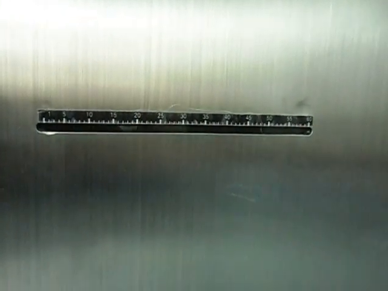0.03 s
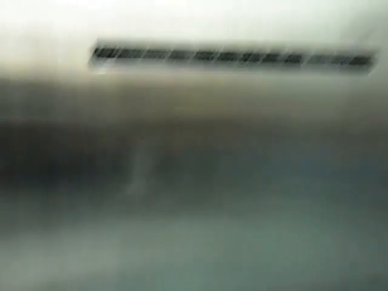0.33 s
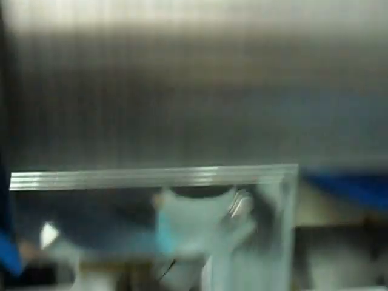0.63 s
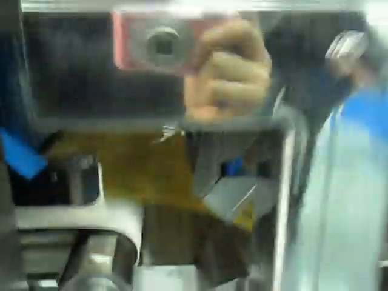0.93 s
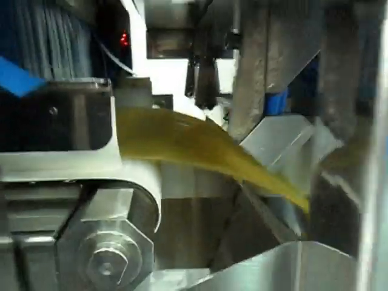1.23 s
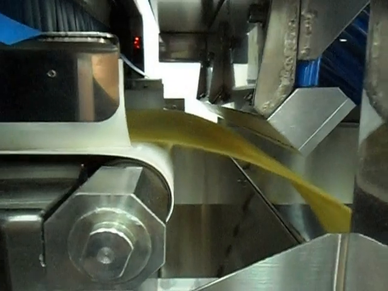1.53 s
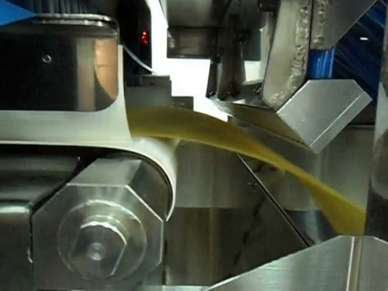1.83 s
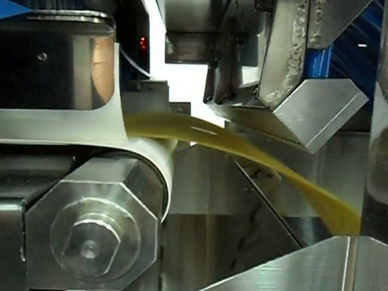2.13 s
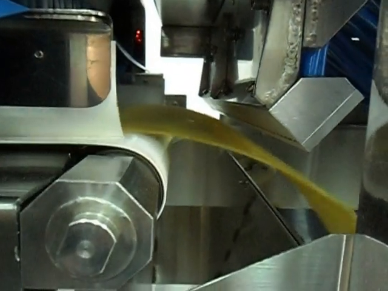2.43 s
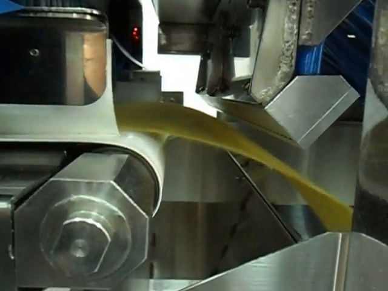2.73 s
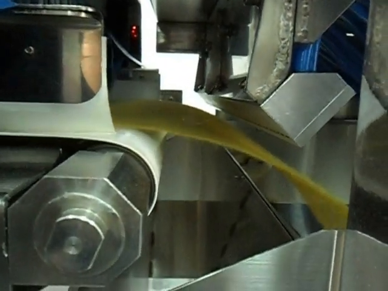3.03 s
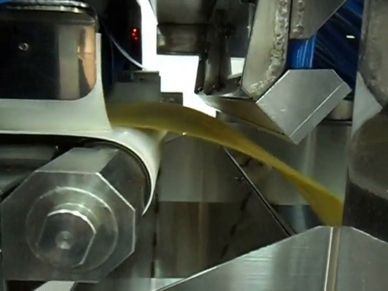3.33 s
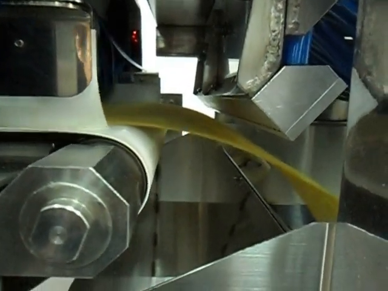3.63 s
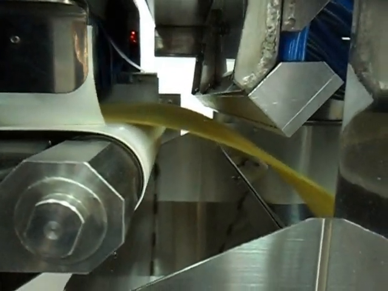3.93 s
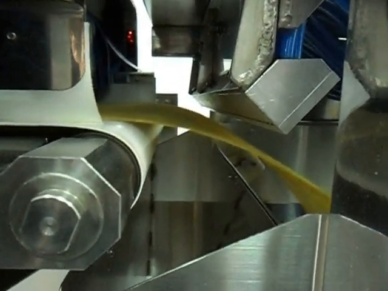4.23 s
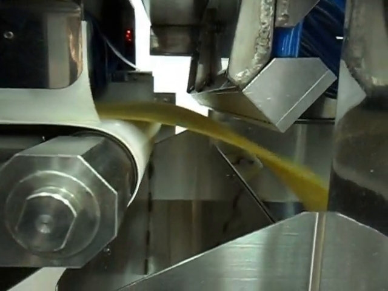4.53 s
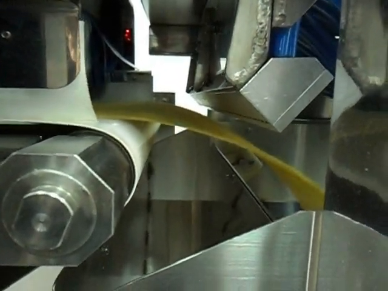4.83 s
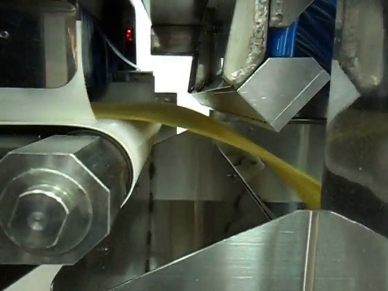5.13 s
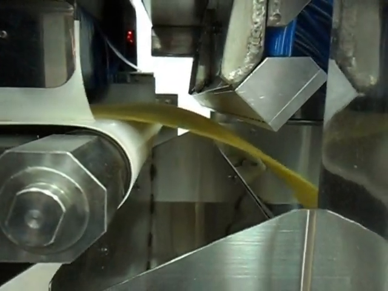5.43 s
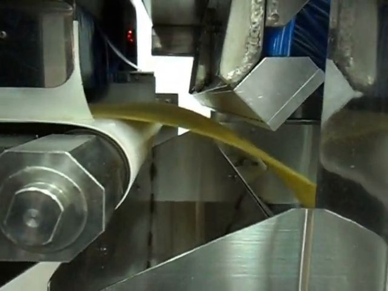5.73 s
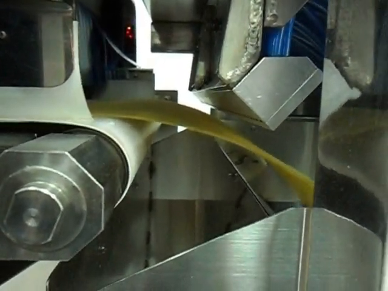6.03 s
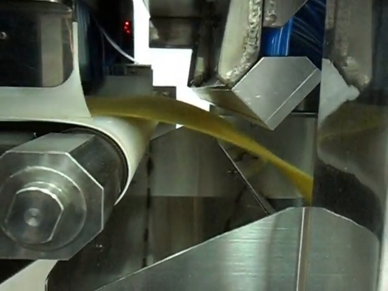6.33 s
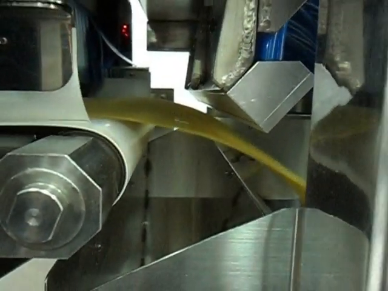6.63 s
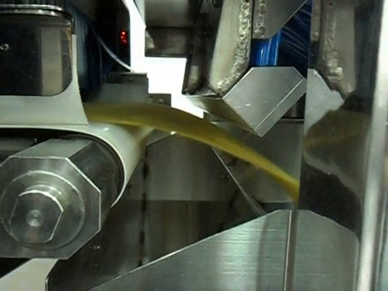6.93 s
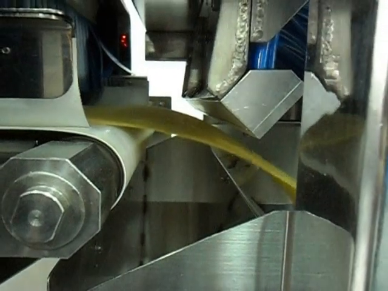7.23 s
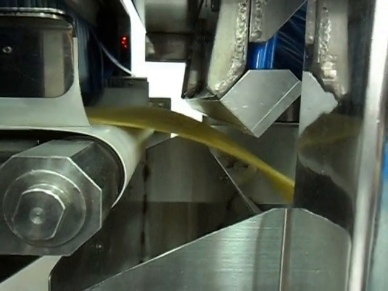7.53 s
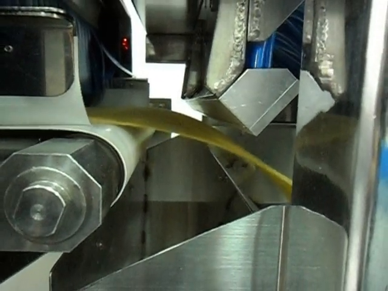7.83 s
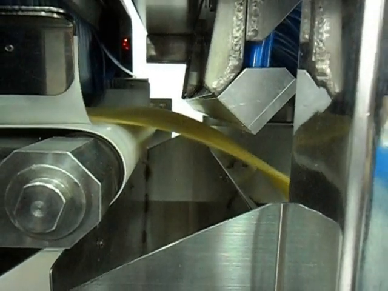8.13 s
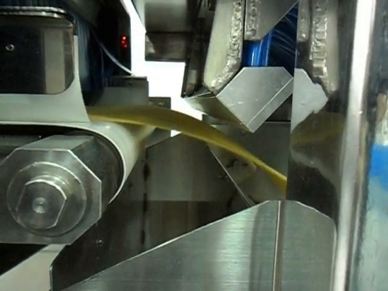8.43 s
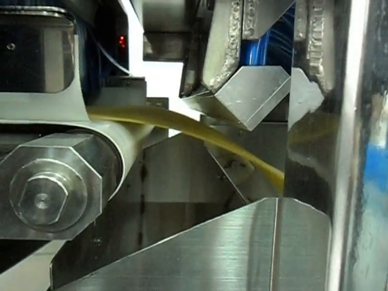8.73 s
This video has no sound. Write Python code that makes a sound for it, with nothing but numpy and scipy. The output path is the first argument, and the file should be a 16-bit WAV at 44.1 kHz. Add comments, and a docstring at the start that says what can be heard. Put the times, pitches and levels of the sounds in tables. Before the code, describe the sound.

Grain roars and hisses through a sorting machine, heard close to its steel cabinet in a factory. Motors throb underneath and the belt whines faintly. The rush swells several times and drops back suddenly when an air valve fires with a loud, briefly ringing crack. Eight such cracks come at uneven intervals, with a pause in the middle that holds a quick cluster of dull knocks. Small grain ticks come late, around a final swell.

```python
"""First comes a low factory drone; it fades as grain rushes off a belt through a sorter's steel cabinet.
The belt whines thinly, and three motors throb against each other under the overtones of a shaking frame.
The rush builds in swells, each cut back by an air valve whose sharp crack rings in the cabinet
and can overload the microphone. A few dull knocks come from further off; late on, stray grains tick."""
import sys
import numpy as np
from scipy import signal
from scipy.fft import rfft, irfft
from scipy.io import wavfile

SR = 44100
rng = np.random.default_rng(int(sys.argv[2]) if len(sys.argv) > 2 else 0)


def wav_record(signal):
    """Record a signal, one row per channel, as 16-bit PCM in the file named by sys.argv[1]."""
    frames = np.transpose(np.atleast_2d(signal))
    bounded = np.clip(frames, -1, 1)
    # unit amplitude maps onto the largest positive 16-bit level
    quanta = np.round(bounded * 32767).astype(np.int16)
    wavfile.write(sys.argv[1], SR, quanta)


N = 386757
TIME, HZ = np.arange(N) / SR, np.fft.rfftfreq(N, 1 / SR)


def amp(db):
    """Turns decibels into a multiplier."""
    return 10 ** (np.asarray(db) / 20)


def unit(x):
    """Scales a signal to an average (rms) size of one."""
    return x / np.sqrt(np.mean(x ** 2) + 1e-20)


def shape(points, hz):
    """Reads a tone colour in dB, joining its points on a log-frequency axis."""
    f, db = np.transpose(points)
    return np.interp(np.log(hz + 1), np.log(f + 1), db)


def curves(rows):
    """Joins timed rows into one curve for each column after the time."""
    s, *columns = np.transpose(rows)
    return [np.interp(TIME, s, c) for c in columns]


def add(mix, s, sound):
    """Mixes a sound in at s seconds."""
    part = mix[round(s * SR):][:len(sound)]
    part += sound[:len(part)]


def wander(axis, step):
    """A random curve of size one that heads for a new value every step."""
    knots = rng.standard_normal(len(axis))
    return unit(np.interp(axis / step, np.arange(len(knots)), knots))


def noise(db):
    """Noise of size one with the tone colour db."""
    return unit(irfft(rfft(rng.standard_normal(N)) * amp(db), N))


def colour(x, db_of, size=4096):
    """Gives x the tone colour db_of(Hz), with no ringing ahead of the sound."""
    log_gain = np.log(amp(db_of(abs(np.fft.fftfreq(size, 1 / SR)))))
    taps = np.fft.ifft(np.exp(np.conj(signal.hilbert(log_gain)))).real
    return signal.fftconvolve(x, taps / np.linalg.norm(taps))[:len(x)]


# Tone colours of the hall and the drive. Each row: frequency in Hz, relative level in dB.
HALL_COLOUR = [(40, -12), (125, 2.5), (220, -9), (305, 3.5), (350, -1.5), (410, -5), (500, 2.5), (700, -19),
               (1300, -21), (4000, -35), (14000, -70)]
RUMBLE_COLOUR = [(15, -20), (35, 3), (68, -8), (97, 6), (135, 0.5), (200, -30), (1000, -60)]
# How the hall fades. Each row: time in seconds, level in dB.
HALL_FADE = [(0, -25.5), (.1, -35), (.9, -32), (1.3, -42), (2, -60)]


def drone(rumble_db=-45):
    """The hall's drone fades as the microphone nears the sorter's open window; the drive rumbles on."""
    hall = amp(curves(HALL_FADE)[0]) * noise(shape(HALL_COLOUR, HZ))
    return hall + amp(rumble_db) * noise(shape(RUMBLE_COLOUR, HZ))


# The cabinet's resonances and one dip. Each row: frequency in Hz, width in Hz, boost in dB.
RESONANCES = [(567, 28, 9.5), (882, 23, 6), (912, 21, -11), (1122, 51, 13.5), (1710, 84, 5.5),
              (2350, 24, 4.5), (2740, 69, 5.5), (5600, 60, 2.5), (8900, 58, 1.5)]


def cabinet(hz):
    """The boost in dB that the steel cabinet gives to sounds inside it."""
    return sum(db / (1 + (2 * (hz - f) / width) ** 2) for f, width, db in RESONANCES)


# Swells of the rush. Each row: start in seconds, the rise it heads for in dB.
SWELL_STARTS = [(.3, 5.5), (1.4, 10), (4.15, 10.5), (5.53, 11), (8.02, 15.5)]


def swell(rise_s=0.63, drop_s=0.072):
    """Extra level in dB that climbs towards a limit and collapses at the next valve shot."""
    lift = np.zeros(N)
    for start, rise_db in SWELL_STARTS:
        cut = min([shot[0] for shot in VALVE_SHOTS if shot[0] > start], default=TIME[-1])
        build = 1 - np.exp(-(np.clip(TIME, start, cut) - start) / rise_s)
        lift += rise_db * build * np.exp(-np.maximum(TIME - cut, 0) / drop_s)
    return lift


# The rush between swells. Each row: time in seconds, base level of the roar and of the hiss in dB.
CALM_LEVELS = [(0, -34.5, -42.5), (1.2, -34.5, -44.5), (3, -35, -45), (6.2, -35.5, -45), (6.9, -38.5, -48),
               (8.1, -39.5, -49.5)]


def flow(roar_share=0.93):
    """Levels in dB of the roar and the hiss, which ride on the same swells."""
    (roar_db, hiss_db), lift = curves(CALM_LEVELS), swell()
    return roar_db + roar_share * lift, hiss_db + lift


# Tone colours of the rush. Each row: frequency in Hz, relative level in dB.
ROAR_COLOUR = [(20, -28), (70, -2), (130, -6.5), (220, -6), (300, 1), (430, -4.5), (600, -1), (780, -2),
               (1000, -7.5), (1160, -14.5), (1270, -14), (5000, -77)]
HISS_COLOUR = [(300, -1), (1400, -4), (2100, 1.5), (2800, -0.5), (3500, -4), (4700, -3), (5600, -0.5),
               (6700, -7), (7700, -10.5), (8800, -6), (10100, -8), (11000, -19.5), (12200, -17.5),
               (13700, -43)]


def grain_rush(roar_trim_db=0.68, hiss_trim_db=-0.11, ripple_db=1.43, lumps_db=0.67, flicker_db=0.2):
    """Belt and air roar and countless grains hiss, all coloured by the cabinet."""
    walls = cabinet(HZ) + ripple_db * wander(HZ, 28)  # many weak resonances between the main ones
    roar_db, hiss_db = flow()
    roar = noise(shape(ROAR_COLOUR, HZ) + walls)
    roar *= amp(roar_db + roar_trim_db + lumps_db * wander(TIME, .035))  # the stream comes in lumps
    hiss = noise(shape(HISS_COLOUR, HZ) + walls)
    hiss *= amp(hiss_db + hiss_trim_db + flicker_db * wander(TIME, 0.013))
    return roar + hiss


# The belt's tones. Each row: pitch in Hz, level in dB compared with the hiss.
BELT_TONES = [(2750, -17), (5478, -16.5), (7442, -24.5)]


def belt_whine(waver_hz=14):
    """The running belt gives thin, unsteady tones that rise and fall with the hiss."""
    tones = np.zeros(N)
    for hz, db in BELT_TONES:
        strength = amp(db + 2 * wander(TIME, 0.042))
        pitch = hz + waver_hz * wander(TIME, .015)
        tones += strength * np.sin(2 * np.pi * np.cumsum(pitch) / SR)
    return np.sqrt(2) * amp(flow()[1]) * tones


# The three motors: their pitches in Hz, then their base levels in dB.
MOTOR_PITCHES = [44.47, 49.1, 50.02]
MOTOR_LEVELS = [-42.5, -37.5, -36.5]
# Strength of their throb. Each row: time in seconds, change of level in dB.
THROB_LEVELS = [(0, -4), (1.5, 0), (3, -0.5), (4.7, 1), (5.9, 2), (7, -2.5), (8.7, 0)]


def motors(in_step_s=.43):
    """Motors at nearly the same speed drift in and out of step, so their hum throbs."""
    tones = sum(amp(db) * np.cos(2 * np.pi * hz * (TIME - in_step_s))
                for hz, db in zip(MOTOR_PITCHES, MOTOR_LEVELS))
    return np.sqrt(2) * amp(curves(THROB_LEVELS)[0]) * tones


# The frame's overtones, each strongest at one spot on the microphone's way. Each row: multiple of the
# shaking rate, time at that spot in seconds, base level in dB, fade to either side in dB per second.
FRAME_OVERTONES = [(5, 1.17, -40, 6), (6, 4.52, -38.5, 6), (7, 0.27, -33, 11), (8, 2.87, -35.5, 4.5),
                   (10, 0.92, -40, 4)]


def frame_hum(shake_hz=25.02, swell_share=0.66, waver_db=0.83):
    """The shaking frame hums with wavering overtones that partly follow the swells."""
    turns = shake_hz * TIME + 0.01 * wander(TIME, .25)
    tones = np.zeros(N)
    for multiple, s, db, fade in FRAME_OVERTONES:
        strength = amp(db - fade * abs(TIME - s) + waver_db * wander(TIME, .12))
        tones += strength * np.sin(2 * np.pi * (multiple * turns + rng.random()))
    return np.sqrt(2) * amp(swell_share * swell()) * tones


def reflections(t, first_per_s=2500, dense_s=.03):
    """Echoes off steel walls: separate at first, soon a crowd."""
    share = np.clip(first_per_s / SR + (t / dense_s) ** 2, 1e-3, 1)
    return rng.standard_normal(len(t)) * (rng.random(len(t)) < share) / np.sqrt(share)


# Valve shots. Each row: start in seconds, base level in dB, pulse length in milliseconds,
# treble tilt in dB, relative level of the hall's echo in dB, pitch of the nozzle's ring in Hz.
VALVE_SHOTS = [(0.2676, -5, 0.1, -2.5, -13, 296), (0.9918, -3, 0.64, -3.5, -19.5, 1170),
               (1.2622, -9, 0.38, -1.5, -17.5, 895), (2.4025, -4.5, 0.35, 1.5, -22, 864),
               (5.5006, -4.5, 0.38, 0.5, -20, 898), (6.339, -6.5, 0.33, 0.5, -23, 384),
               (6.6309, -9, 0.099, -1.5, -19, 626), (7.4901, -10, 0.17, -0.5, -18.5, 923)]
# Tone colour of the air blast. Each row: frequency in Hz, relative level in dB.
BLAST_COLOUR = [(20, -17), (90, -3.5), (250, -5), (500, -1), (900, 1.5), (1400, -4.5), (2600, -2),
                (3600, -8), (5400, -4.5), (7200, -13), (10000, -15), (11200, -29), (13000, -29),
                (14500, -60)]
# Notes of the cabinet's air. Each row: pitch in Hz, relative level in dB, seconds to fade 60 dB (t60).
AIR_NOTES = [(44, -14.5, 0.12), (121.8, -11, 0.14), (263.5, -12, 0.13), (357, -18, 0.12),
             (673, -26.5, 0.16), (984, -13.5, 0.1), (1119, -11, 0.057)]


def valves(pulse_db=10, cabinet_t60=0.073, hall_t60=0.42, hall_hz=7000, alike=0.58, ring=0.26,
           nozzle_db=-8.5, nozzle_t60=0.096):
    """Each shot's pressure pulse echoes off the steel, sets air and nozzle ringing and dies in the hall."""
    out, t = np.zeros(N), np.arange(SR // 2) / SR
    shared_echoes = reflections(t)  # nozzles sit side by side, so their echoes are partly alike
    for s, db, pulse_ms, tilt_db, hall_db, nozzle_hz in VALVE_SHOTS:
        age = t * 1000 / pulse_ms  # in pulse lengths
        pulse = signal.lfilter(*signal.butter(2, 7000, fs=SR), (1 - age) * np.exp(-age))
        echoes = np.sqrt(alike) * shared_echoes + np.sqrt(1 - alike) * reflections(t)
        echoes *= amp(-60 * t / cabinet_t60)
        tail = rng.standard_normal(len(t)) * amp(hall_db - 60 * t / hall_t60)
        tail = signal.lfilter(*signal.butter(1, hall_hz, fs=SR), tail)  # the hall answers duller
        blast = colour(echoes + tail, lambda hz: shape(BLAST_COLOUR, hz) + ring * cabinet(hz)
                       + tilt_db * np.tanh(np.log((hz + 1) / 1500)))
        notes = sum(amp(level - 60 * t / t60) * np.sin(2 * np.pi * hz * t)
                    for hz, level, t60 in [*AIR_NOTES, (nozzle_hz, nozzle_db, nozzle_t60)])
        add(out, s, amp(db) * (amp(pulse_db) * pulse + blast + notes))
    return out


def blows(rows, tone_colour, ping_db, ring=0.58, main_db=7, sharpness=9):
    """Short blows, each ringing at its own pitch and scattering into dying echoes."""
    out, t = np.zeros(N), np.arange(SR // 2) / SR
    for s, db, t60, main_hz in rows:
        decay = amp(db - 60 * t / t60)
        echoes = colour(reflections(t) * decay, lambda hz: shape(tone_colour, hz) + ring * cabinet(hz)
                        + main_db / (1 + (sharpness * (hz / main_hz - 1)) ** 2))
        add(out, s, echoes + amp(ping_db) * decay * np.sin(2 * np.pi * main_hz * t))
    return out


# Knocks. Each row: start in seconds, base level in dB, seconds to fade 60 dB, pitch in Hz.
KNOCK_HITS = [(.721, -21, 0.23, 371), (.778, -33, 0.18, 290), (3.257, -25, 0.096, 595),
              (3.3535, -13.5, 0.067, 660), (3.369, -17.5, 0.087, 915), (3.385, -23.5, 0.61, 606),
              (6.245, -45, 0.23, 580)]
# Their tone colour. Each row: frequency in Hz, relative level in dB.
KNOCK_COLOUR = [(40, -20), (100, -5), (190, -3.5), (400, -0.5), (650, -4.5), (950, -8.5), (1400, -24.5),
                (3200, -27.5), (4500, -48), (14000, -61)]


def knocks():
    """Dull knocks ring briefly, further off."""
    return blows(KNOCK_HITS, KNOCK_COLOUR, ping_db=-4)


# Ticks. Each row: start in seconds, base level in dB, seconds to fade 60 dB, pitch in Hz.
TICK_HITS = [(6.7045, -31.5, 0.06, 3000), (6.7843, -28, 0.015, 1570), (8.557, -39, 0.015, 1200)]
# Their tone colour. Each row: frequency in Hz, relative level in dB.
TICK_COLOUR = [(300, -26), (1000, 7), (1600, 2), (3200, -3), (5600, 0), (7000, -12), (11000, -27),
               (14000, -50)]


def grain_ticks():
    """Stray grains hit the steel with small, bright ticks."""
    return blows(TICK_HITS, TICK_COLOUR, ping_db=1)


def scene():
    """The sorter at work, in one channel."""
    machine = grain_rush() + belt_whine() + motors() + frame_hum() + drone()
    hits = valves() + knocks() + grain_ticks()
    return (machine + hits)[None]


def record(dry, droop_hz=13500, edge_hz=16100):
    """Loud shots overload the microphone; the high treble droops and the very top is cut off."""
    clipped = np.clip(dry, -.97, .97)
    dulled = signal.lfilter(*signal.butter(4, droop_hz, fs=SR), clipped)
    top_cut = signal.firwin(511, edge_hz, window=("kaiser", 9), fs=SR)
    return signal.oaconvolve(dulled, top_cut[None], "same")


dry = scene()
out = record(dry)
wav_record(out)
```